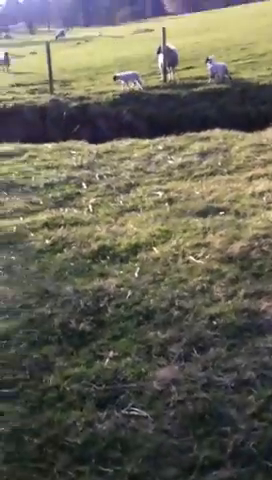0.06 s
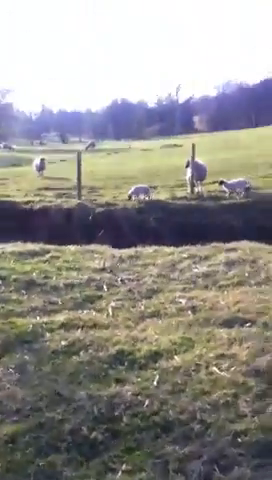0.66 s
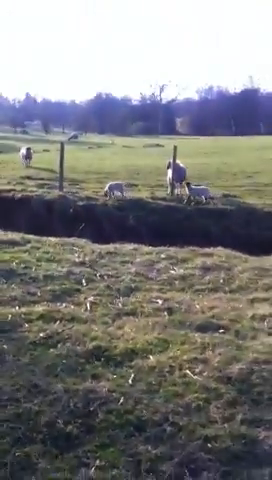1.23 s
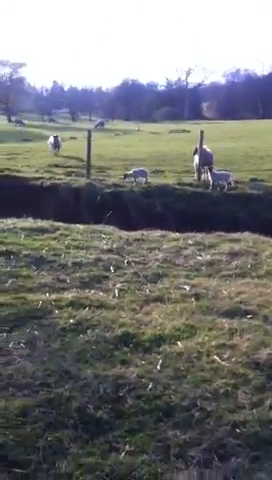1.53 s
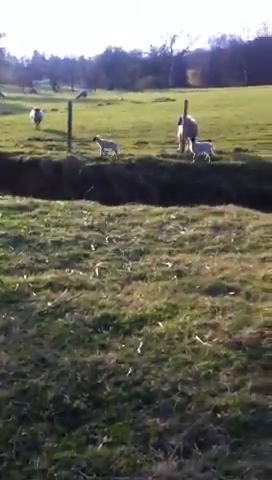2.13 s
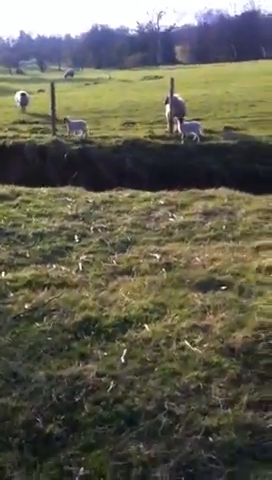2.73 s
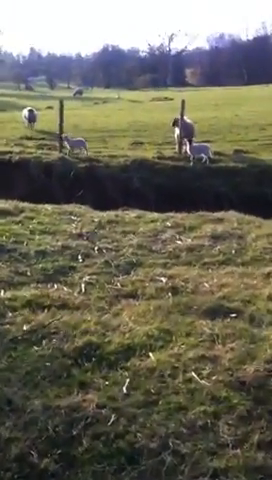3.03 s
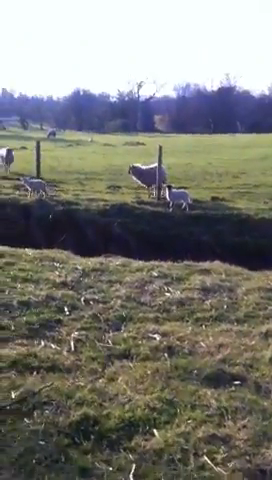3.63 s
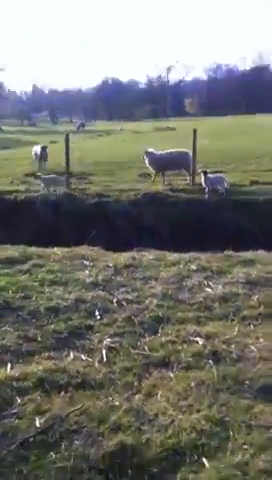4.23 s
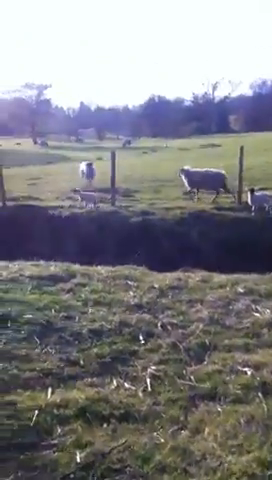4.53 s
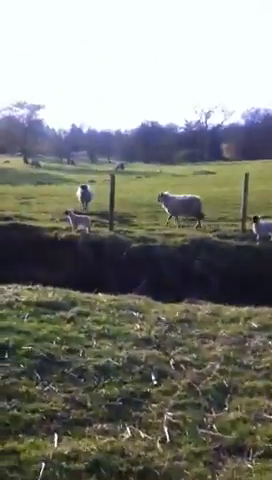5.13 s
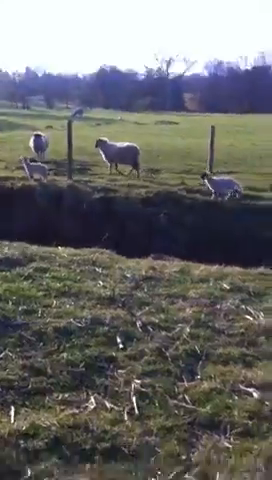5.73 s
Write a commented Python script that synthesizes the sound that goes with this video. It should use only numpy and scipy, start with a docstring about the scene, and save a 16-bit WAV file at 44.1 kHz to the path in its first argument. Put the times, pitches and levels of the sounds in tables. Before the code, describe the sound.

A lamb bleats thinly, a ewe answers with a low rattle, and the lamb calls again, amid microphone wind buffets and clicks.

```python
"""A lamb's thin bleat ends in an open field; a ewe answers with a low, throbbing rattle; the lamb calls again.
The lamb is a hoarse stack of harmonics shaped by its throat, the ewe a train of vocal fold snaps
ringing hers. Close by, cloth rubs on a hand-held microphone, gusts buffet it with low eddies
and sharp clicks ring its case, over a faint hush of moving air."""
import sys
import numpy as np
from scipy import signal
from scipy.fft import rfft, irfft, next_fast_len
from scipy.io import wavfile
from scipy.ndimage import uniform_filter1d

SR = 44100
rng = np.random.default_rng(int(sys.argv[2]) if len(sys.argv) > 2 else 0)


def waveform_to_disk(signal):
    """Save audio, clipped to [-1, 1], as 16-bit WAV at the path in sys.argv[1]."""
    frames = np.transpose(np.atleast_2d(signal))
    scaled = np.clip(frames, -1, 1) * 32767
    samples = np.round(scaled).astype(np.int16)
    wavfile.write(sys.argv[1], SR, samples)


N = 258646
TIME_S = np.arange(N) / SR

# The lamb's two calls. Each row: time in seconds, pitch in Hz, level of the lowest resonance in dB.
LAMB_FIRST_CALL = [(0, 320.7, -52.5), (.06, 316.7, -52.5), (.1, 323.5, -47), (.14, 316.8, -57),
                   (0.179, 320, -48.5), (.25, 286, -80)]
LAMB_SECOND_CALL = [(3.38, 318.8, -70), (3.398, 332.5, -71), (3.41, 328.4, -57.5), (3.558, 337.6, -58.5),
                    (3.568, 343.2, -56), (3.596, 327.7, -58.5), (3.762, 327, -61), (3.798, 331, -51.5),
                    (3.866, 333.6, -48), (3.918, 326.6, -64.5), (3.95, 328.6, -52), (4.05, 322.2, -50.5),
                    (4.092, 312.7, -56), (4.15, 268, -63)]
# Voicing per call. Each row: time of half-open mouth in seconds, open-mouth resonance in Hz,
# base level of the upper resonances in dB, their swell time in seconds, base hoarseness from 0 to 1.
LAMB_VOICINGS = [(-.3, 1244, -53.5, 0.0027, .45), (3.585, 1297, -56.5, 0.12, .2)]
# Throat resonances. Each row: centre in Hz, width in Hz, relative gain in dB.
LAMB_UPPER_FORMANTS = [(3280, 102, -2), (3940, 140, -16), (4640, 260, -10.5), (5270, 150, -19),
                       (5830, 390, -12), (6350, 120, -16.5), (7300, 700, -26)]
EWE_FORMANTS = [(642, 38, -19), (1550, 110, -14), (1900, 300, -14), (2400, 220, -4), (3080, 150, -12),
                (4350, 350, -23), (4800, 220, -28), (5700, 700, -26), (7400, 1600, -27)]
# Noise spectra of air, cloth and wind. Each row: frequency in Hz, relative level in dB.
AIR_SPECTRUM = [(15, -48), (25, -20.5), (161, 1), (439, -4.5), (607, -3.5), (754, -4.5), (887, -4),
                (962, -4), (1160, -8.5), (2110, -14), (3160, -16.5), (3720, -16.5), (10400, -24),
                (14800, -25.5), (16000, -22)]
RASP_SPECTRUM = [(100, -18), (450, -2.5), (1100, 5), (2100, -0.5), (3000, -7), (5000, -8.5), (9000, -16.5),
                 (16000, -31)]
HISS_SPECTRUM = [(300, -8.5), (2000, -0.5), (3300, 0), (4400, -6.5), (6500, 2.5), (9000, -2),
                 (11000, -10.5), (14000, -6), (16000, -16)]
SCUFF_SPECTRUM = [(100, -30), (330, -6), (520, 1), (750, -12.5), (1200, -27), (4000, -49)]
RUMBLE_SPECTRUM = [(25, -42), (50, -26.5), (80, -9.5), (120, 1.5), (160, -4), (210, -7), (300, -14),
                   (450, -24), (900, -71)]
# Cloth strokes, and at 1.926 s a brief rattle just after a click on the case. Each row: centre in seconds, half
# length in seconds, rasp in dB, hiss in dB.
SWISHES_AND_RATTLE = [(0.122, 0.14, -51.5, -59), (0.387, 0.062, -58, -69), (0.52, 0.056, -51.5, -56),
                      (0.671, 0.05, -58.5, -55.5), (0.769, 0.028, -60, -59), (1.004, 0.097, -67, -68),
                      (1.239, 0.064, -65.5, -56), (1.559, 0.032, -53, -55.5), (1.926, 0.013, -53.5, -59),
                      (4.123, 0.06, -64, -64), (4.28, 0.024, -62, -62), (4.879, .045, -68, -59.5),
                      (5.122, 0.15, -63.5, -76), (5.5, .21, -65, -74)]
# Dull scuffs. Each row: centre in seconds, half length in seconds, level in dB.
CLOTH_SCUFFS = [(4.502, 0.016, -54.5), (4.523, 0.0099, -48.5), (4.626, 0.019, -59.5)]
# Gusts on the microphone. Each row: first eddy in seconds, length in seconds, nominal peak in dB.
WIND_GUSTS = [(.15, .08, -53), (.366, 0, -42), (.434, 0.056, -33.5), (0.601, .035, -34), (.744, .023, -31),
              (.8, .08, -38.5), (1.16, 0.12, -54), (1.383, 0.04, -35.5), (1.456, 0.023, -40),
              (1.524, 0, -41.5), (1.563, .025, -31), (1.656, .068, -28), (1.766, .03, -36),
              (1.9, 0.0066, -38.5), (1.978, 0.046, -47), (2.202, 0, -34), (2.306, 0, -47.5),
              (2.374, 0.015, -35), (2.44, .027, -45.5), (2.537, 0, -40.5), (2.58, 0.027, -42.5),
              (2.638, 0.0045, -33), (3.175, .035, -47), (3.74, 0.032, -54), (4.47, 0.0074, -53)]
# Clicks on the case. Each row: start in seconds, ring time factor, frequency in Hz of the mode
# with a node at the contact, then level in dB in the low, middle, high and top band.
CASE_CLICKS = [(0.427, 1.47, 1660, -32, -43.5, -39, -55), (0.571, 0.54, 1660, -46, -62, -59, -75),
               (0.9324, 0.93, 5240, -59, -60, -67, -71), (0.9637, 1, 570, -51, -56.5, -68, -75),
               (0.9911, 0.77, 2670, -42, -51.5, -66, -65), (1.037, 1.2, 570, -60, -65, -68, -79),
               (1.8057, 0.94, 1090, -55.5, -45.5, -50, -77), (1.9031, 1.1, 2750, -33, -24, -28.5, -41.5),
               (2.369, 0.35, 4400, -63, -68, -59.5, -63), (2.3848, 1.4, 2300, -42, -63, -65, -65),
               (2.9918, 1.34, 4340, -36, -23.5, -28.5, -25.5), (3.4053, 1.7, 2300, -58.5, -66, -68, -70),
               (4.949, 2.2, 2300, -67, -67, -63, -65)]
# Those four bands. Each row: lower edge in Hz, upper edge in Hz.
CLICK_BANDS = [(200, 1500), (1400, 3300), (3300, 6500), (6500, 16000)]
# Modes of the case. Each row: frequency in Hz, relative level in dB, base T60 in seconds.
CASE_MODES = [(300, -1.5, 0.007), (576, 0.5, 0.0069), (792, -6.5, 0.022), (1090, 8, 0.0099),
              (1675, -5, 0.0095), (2040, -2.5, 0.009), (2320, 7, 0.0063), (2750, 3, 0.0087),
              (4380, 8, 0.0019), (5250, -6.5, 0.0059), (6210, -0.5, 0.0025), (7940, 5.5, 0.0024),
              (8520, -8, 0.0061), (10900, -21.5, 0.0033), (14000, -7, 0.00365)]


def undb(db):
    """Decibels to gain."""
    return 10 ** (np.asarray(db) / 20)


def unit_rms(x):
    """Scale to rms 1."""
    return x / np.sqrt(np.mean(x ** 2) + 1e-20)


def ramp(start_s, length_s):
    """Linear rise from 0 to 1."""
    return np.clip((TIME_S - start_s) / length_s, 0, 1)


def bump(centre_s, half_s):
    """Gaussian swell, peak 1."""
    return np.exp(-np.minimum(((TIME_S - centre_s) / half_s) ** 2, 50))


def wander(rate_hz):
    """Random drift, spread near 1."""
    points = rng.standard_normal(8192)
    return np.interp(TIME_S * rate_hz, np.arange(len(points)), points)


def noise(spectrum):
    """Shaped noise, rms 1."""
    hz, db = np.transpose(spectrum)
    n = next_fast_len(N)
    bins_hz = np.maximum(np.fft.rfftfreq(n, 1 / SR), 1)
    gain = undb(np.interp(np.log(bins_hz), np.log(hz), db))
    return unit_rms(irfft(rfft(rng.standard_normal(n)) * gain, n)[:N])


def resonate(x, hz, width_hz):
    """One resonance, gain 1 at its centre."""
    return signal.lfilter(*signal.iirpeak(hz, hz / width_hz, fs=SR), x)


def resonance_gain(at_hz, hz, width_hz):
    """Gain of a resonance at a given frequency."""
    return 1 / np.sqrt(1 + ((at_hz / hz - hz / at_hz) * hz / width_hz) ** 2)


def lamb_harmonics(phase, pitch_hz, first_hz, first_db, upper_db, first_width_hz=110, top_hz=7300):
    """The throat's lowest and upper resonances share their power among fluttering harmonics."""
    orders = np.arange(1, 27)[:, None]
    hz = orders * pitch_hz
    first = resonance_gain(hz, first_hz, first_width_hz) ** 2
    upper = sum((undb(db) * resonance_gain(hz, centre_hz, width_hz)) ** 2
                for centre_hz, width_hz, db in LAMB_UPPER_FORMANTS)
    power = first / first.sum(axis=0) * undb(first_db) ** 2
    power += upper / upper.sum(axis=0) * undb(upper_db) ** 2
    power /= 1 + (hz / top_hz) ** 8
    flutter_db = np.minimum(.3 * orders, 4) * np.array([wander(30) for _ in orders])
    return np.sum(np.sqrt(2 * power) * undb(flutter_db) * np.sin(orders * phase), axis=0)


def lamb(call, voicing, closed_hz=1030, opening_s=.099, release_s=.13, jitter=.022, waver=.007):
    """One bleat, hoarse at its ends and in level dips; the opening mouth lifts the lowest resonance."""
    times_s, pitches_hz, levels_db = np.transpose(call)
    opens_s, open_hz, bright_db, swell_s, base_hoarse = voicing
    gate = uniform_filter1d(((TIME_S >= times_s[0]) & (TIME_S <= times_s[-1])) * 1., size=300)
    mouth = .5 + .5 * np.tanh((TIME_S - opens_s) / opening_s)
    dying = ramp(times_s[-1] - release_s, release_s)
    first_hz = closed_hz + (open_hz - closed_hz) * mouth
    first_db = np.interp(TIME_S, times_s, levels_db)
    quaver_db = first_db - uniform_filter1d(first_db, size=8000)
    upper_db = bright_db - 9.5 * (1 - ramp(times_s[0], swell_s)) - 14 * dying ** 2
    upper_db += 2.5 * bump(opens_s, .07) + .16 * quaver_db  # flare on opening, follow the quaver
    hoarse = np.minimum(base_hoarse + .35 * (1 - mouth) + dying + .16 * np.maximum(-quaver_db, 0), 1)
    pitch_hz = np.interp(TIME_S, times_s, pitches_hz)
    pitch_hz *= 1 + jitter * hoarse * wander(260) + waver * wander(35)
    phase = 2 * np.pi * np.cumsum(pitch_hz) / SR
    voice = lamb_harmonics(phase, pitch_hz, first_hz, first_db, upper_db)
    shimmer = undb(3 * hoarse * wander(150))
    puffs = rng.standard_normal(N) * (1 + np.cos(phase))  # turbulence passes the folds once a cycle
    rasp = unit_rms(sum(undb(db) * resonate(puffs, hz, width_hz)
                        for hz, width_hz, db in LAMB_UPPER_FORMANTS))
    return (shimmer * voice + hoarse * undb(upper_db - 9) * rasp) * gate


def field_scatter(direct, tail_db, t60_s):
    """Banks and grass scatter a short, weak tail behind the direct sound."""
    t = TIME_S[:SR // 2]
    tail = rng.standard_normal(len(t)) * undb(-60 * t / t60_s) * (t > .003)
    return direct + undb(tail_db) * signal.fftconvolve(direct, tail / np.linalg.norm(tail))[:N]


def air(low_gain_db=-62, high_gain_db=-61.5, sway_db=.04, split_hz=2200):
    """Moving air: a nearly steady low hush under a steady fine hiss."""
    hush = noise(AIR_SPECTRUM)
    low = signal.sosfiltfilt(signal.butter(2, split_hz, fs=SR, output="sos"), hush)
    return low * undb(low_gain_db + sway_db * wander(13)) + (hush - low) * undb(high_gain_db)


def cloth_rubbing(grain_db=2):
    """Cloth slides by in grainy strokes, each a rasp and a hiss, with a few dull scuffs; one short rattle of
    rasp and hiss follows a click on the case."""
    rasp = sum(undb(db) * bump(at_s, half_s) for at_s, half_s, db, _ in SWISHES_AND_RATTLE)
    hiss = sum(undb(db) * bump(at_s, half_s) for at_s, half_s, _, db in SWISHES_AND_RATTLE)
    scuff = sum(undb(db) * bump(at_s, half_s) for at_s, half_s, db in CLOTH_SCUFFS)
    strokes = rasp * noise(RASP_SPECTRUM) + hiss * noise(HISS_SPECTRUM)
    return strokes * undb(grain_db * wander(600)) + scuff * noise(SCUFF_SPECTRUM)


def wind_buffets(eddy_gap_s=.031, eddy_half_s=.0059, breeze_db=-65.5, calm_db=-72.5, drop_s=2.64):
    """Each gust is a run of brief, low eddies over a rumble that swells with it and never quite dies."""
    eddies, swell = np.zeros(N), np.zeros(N)
    for start_s, length_s, db in WIND_GUSTS:
        gaps = round(length_s / eddy_gap_s)
        eddy_hz = 168.6 + 2 * (db + 37)  # stronger gusts shed faster eddies
        draws = rng.standard_normal((12, 4))
        for place, (late, size, detune, turn) in zip(np.linspace(0, 1, gaps + 1), draws):
            at_s = start_s + place * length_s + .002 * late
            edge_db = 1.5 * abs(2 * place - 1) * (gaps > 0)
            envelope = undb(db - edge_db + 1.5 * size) * bump(at_s, eddy_half_s)
            cycles = eddy_hz * (1 + .12 * detune) * (TIME_S - at_s) + turn
            eddies += envelope * np.cos(2 * np.pi * cycles)
        swell += undb(db) * bump(start_s + length_s / 2, length_s / 2 + .014)
    floor_db = breeze_db + (calm_db - breeze_db) * ramp(drop_s, .55)
    rumble_gain = undb(-12) * swell + undb(floor_db + 3 * wander(6))
    return eddies + noise(RUMBLE_SPECTRUM) * rumble_gain * undb(2 * wander(45))


def case_clicks(contact_s=.0001, node_cut_db=14.5, node_width=.06):
    """Clicks ring the case briefly, less under a firm grip; the contact point sets each band's share."""
    out, t = np.zeros(N + SR), TIME_S[:SR // 20]
    contact = 1 - np.exp(-t / contact_s)
    for band, (low_hz, high_hz) in enumerate(CLICK_BANDS):
        bandpass = signal.butter(3, [low_hz, high_hz], "bandpass", fs=SR, output="sos")
        for start_s, ring_factor, node_hz, *band_db in CASE_CLICKS:
            ring = 0
            for hz, db, t60_s in CASE_MODES:
                if low_hz < hz <= high_hz:
                    mode_db = db - node_cut_db * resonance_gain(hz, node_hz, node_width * node_hz)
                    ring += undb(mode_db - 60 * t / (t60_s * ring_factor)) * np.sin(2 * np.pi * hz * t)
            ring = signal.sosfilt(bandpass, ring * contact)
            onset_rms = np.sqrt(np.mean(ring[:SR // 100] ** 2))
            start = int(start_s * SR)
            out[start:start + len(t)] += undb(band_db[band]) * ring / onset_rms
    return out[:N]


def ewe_gain_db(start_s, end_s, base_db=-33.5, attack_s=.24, release_s=.047):
    """The bleat swells, stalls twice and fades; after each stall the folds snap hard."""
    db = base_db - 4 * (1 - ramp(start_s, attack_s)) - 24 * ramp(end_s - release_s, release_s)
    for stall_s in (2.44, 2.518):
        db += 9.5 * bump(stall_s + .021, .007) - 21 * bump(stall_s, .014)
    return db


def ewe_snap(effort, detune, slack_hz=3250, tense_hz=2660, closing_s=.000095):
    """One snap of the folds rings the throat; effort makes it harder and lowers the main resonance."""
    t = TIME_S[:SR // 25]
    main_formant = (slack_hz + (tense_hz - slack_hz) * effort, 290, -3)
    ring = 0
    for k, (hz, width_hz, db) in enumerate(EWE_FORMANTS[:4] + [main_formant] + EWE_FORMANTS[4:]):
        sag_db = 8 * resonance_gain(hz, 2180, 630) * (1 - effort)  # the middle sinks between throbs
        sign = (-1) ** max(k, 1)  # the lowest two swing together, leaving a hollow between them
        envelope = undb(db + 8.5 * effort - sag_db) * np.exp(-np.pi * width_hz * t)
        ring += sign * envelope * np.sin(2 * np.pi * hz * (1 + detune) * t)
    return ring * (1 - np.exp(-t / closing_s))


def larynx_throbs(first_s=2.494, rate_hz=14.5, count=7, attack_s=.014, release_s=.025):
    """Evenly spaced squeezes of the larynx, each quick to come and slow to let go."""
    peaks_s = first_s + np.arange(count) / rate_hz
    return sum(bump(at_s, np.where(TIME_S < at_s, attack_s, release_s)) for at_s in peaks_s)


def ewe(start_s=2.4, end_s=2.975, start_hz=83.7, full_hz=125, rise_s=.32, throb_lift_hz=34):
    """A rattle of uneven fold snaps that speed up as she gets going, and again with each throb."""
    gain_db = ewe_gain_db(start_s, end_s)
    effort = larynx_throbs()
    snap_hz = start_hz + (full_hz - start_hz) * ramp(start_s, rise_s) + throb_lift_hz * effort
    cycles = np.cumsum(snap_hz * (TIME_S > start_s) * (TIME_S < end_s)) / SR
    snaps = np.flatnonzero(np.diff(np.floor(cycles)))
    draws = rng.standard_normal((200, 4)) * [22, 2.2, .018, .15]
    voice = np.zeros(N)
    for i, (delay_samples, size_db, detune, stray_effort) in zip(snaps, draws):
        snap = ewe_snap(np.clip(effort[i] + stray_effort, 0, 1), detune)
        start = i + int(delay_samples)
        voice[start:start + len(snap)] += undb(gain_db[i] + size_db) * snap
    return voice


def scene():
    """Sheep across the field plus the noises at the microphone, in mono."""
    calls = lamb(LAMB_FIRST_CALL, LAMB_VOICINGS[0]) + lamb(LAMB_SECOND_CALL, LAMB_VOICINGS[1])
    sheep = field_scatter(calls, tail_db=-13, t60_s=.2) + field_scatter(ewe(), tail_db=-10, t60_s=.15)
    return (sheep + case_clicks() + wind_buffets() + cloth_rubbing() + air())[None]


def record(dry, cutoff_hz=15900):
    """A steep low-pass cuts the top."""
    return signal.sosfilt(signal.ellip(10, .2, 70, cutoff_hz, fs=SR, output="sos"), dry)


dry = scene()
out = record(dry)
waveform_to_disk(out)
```